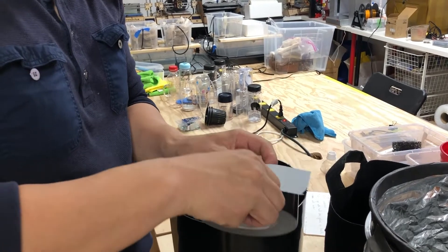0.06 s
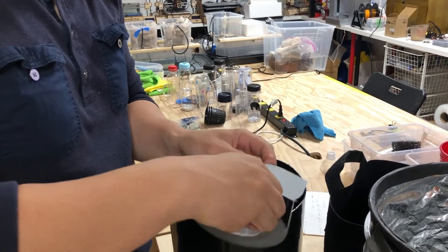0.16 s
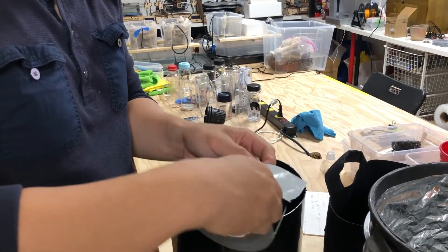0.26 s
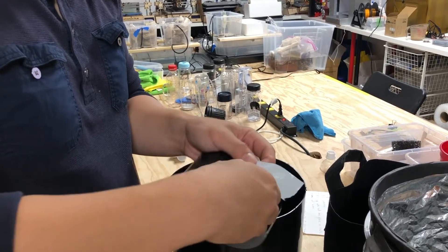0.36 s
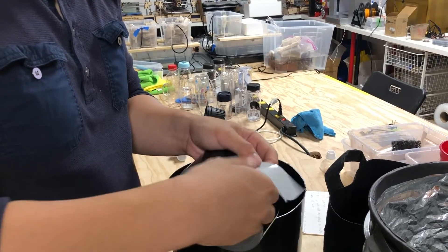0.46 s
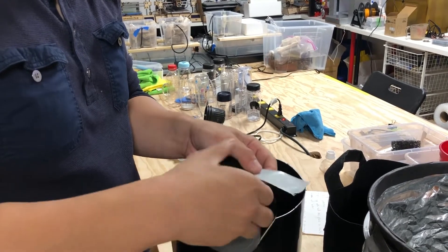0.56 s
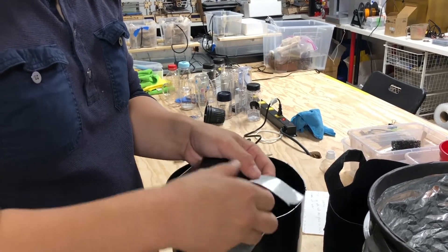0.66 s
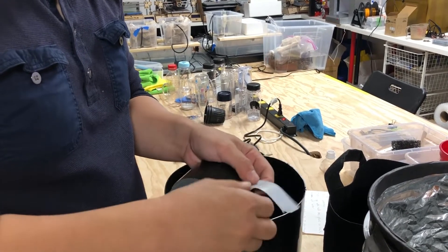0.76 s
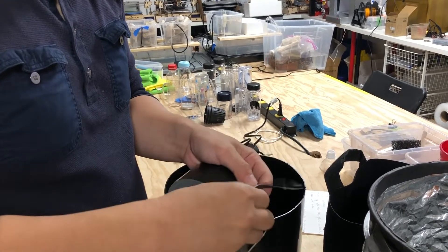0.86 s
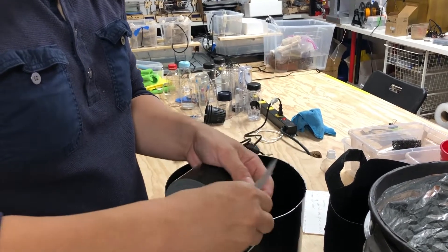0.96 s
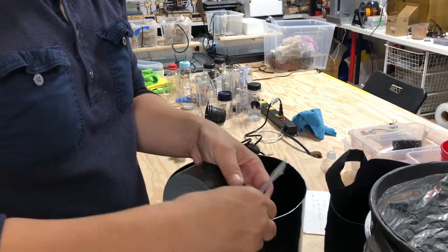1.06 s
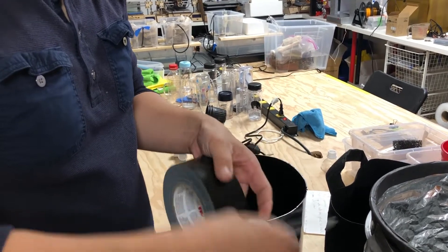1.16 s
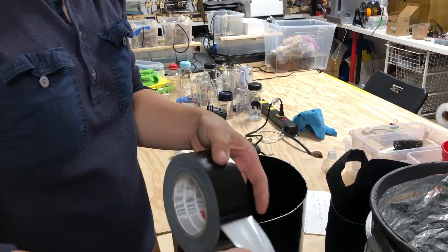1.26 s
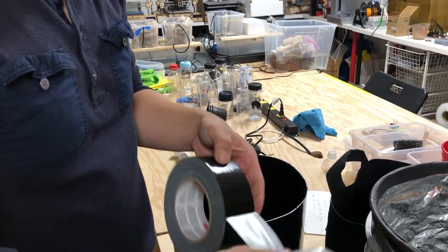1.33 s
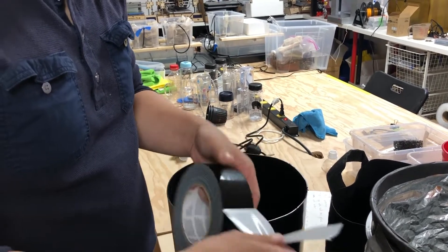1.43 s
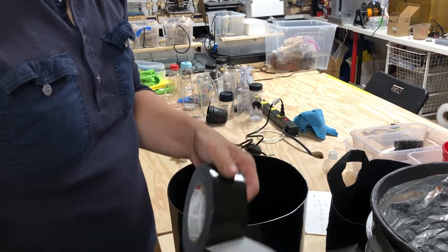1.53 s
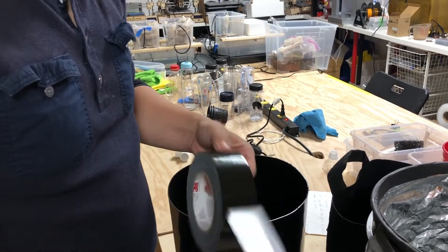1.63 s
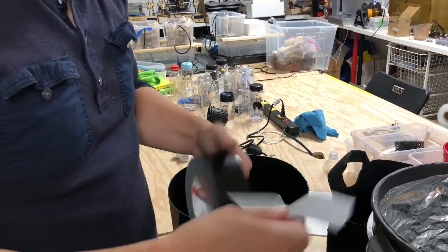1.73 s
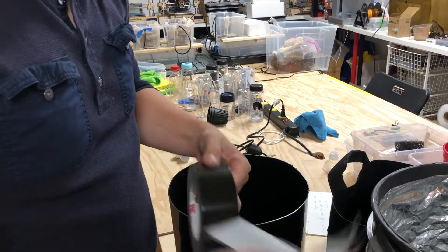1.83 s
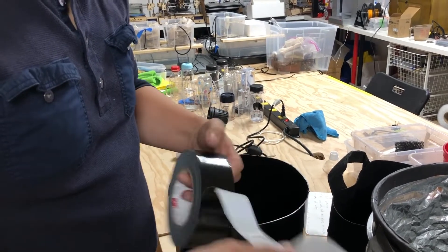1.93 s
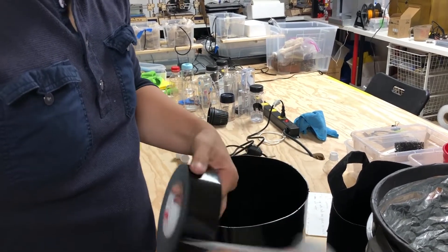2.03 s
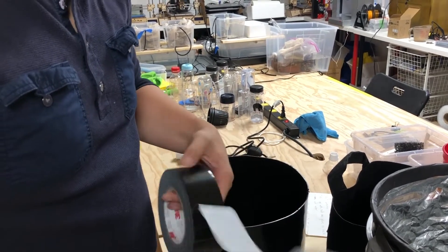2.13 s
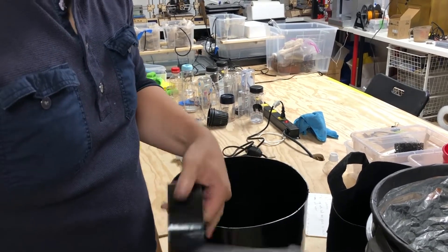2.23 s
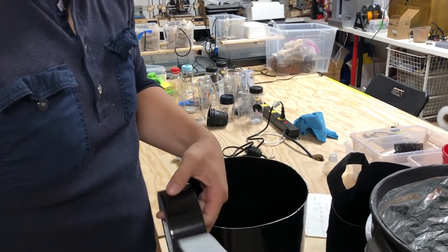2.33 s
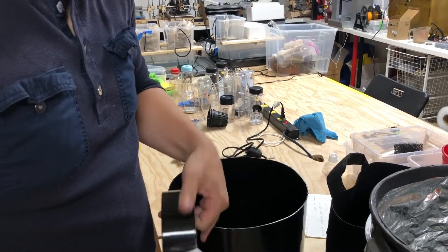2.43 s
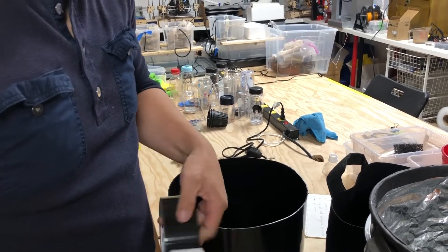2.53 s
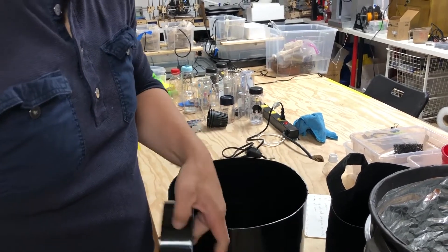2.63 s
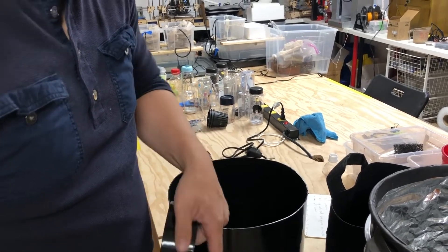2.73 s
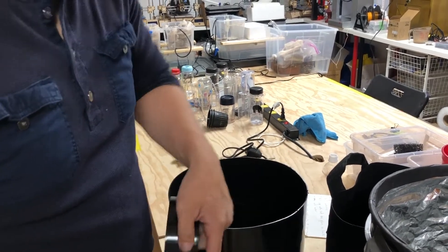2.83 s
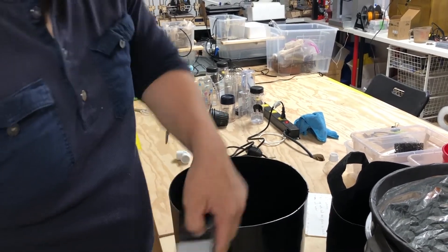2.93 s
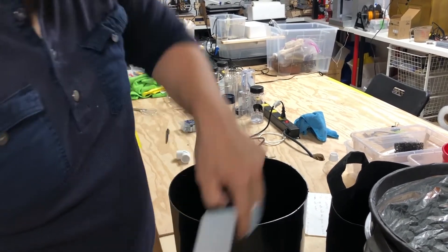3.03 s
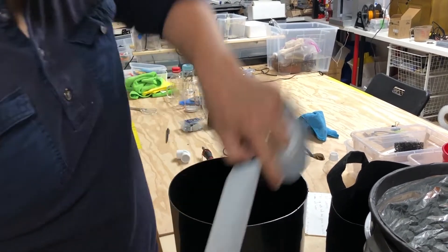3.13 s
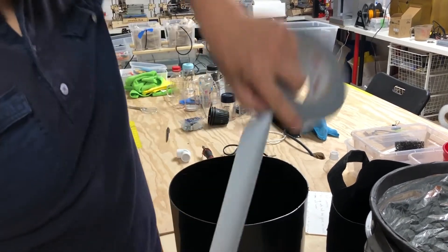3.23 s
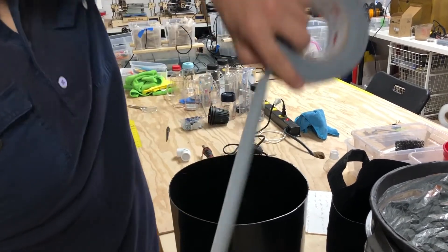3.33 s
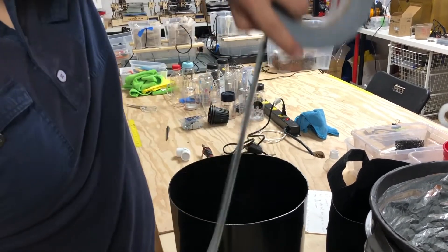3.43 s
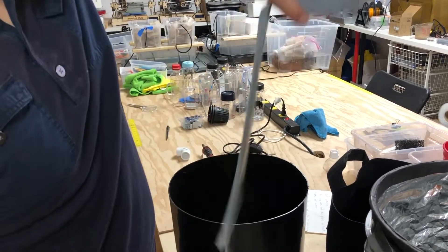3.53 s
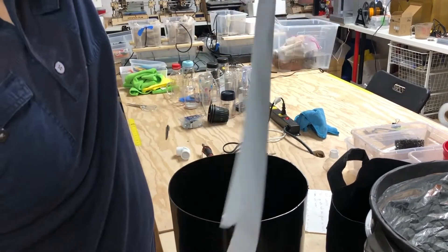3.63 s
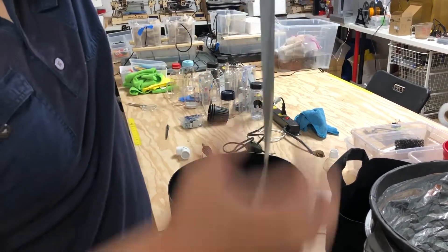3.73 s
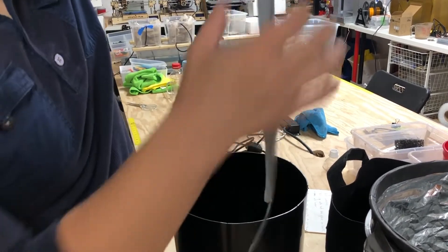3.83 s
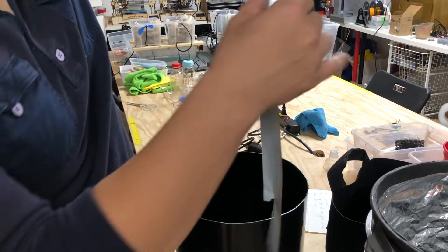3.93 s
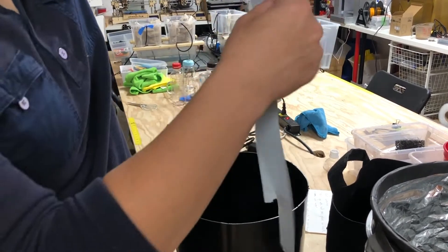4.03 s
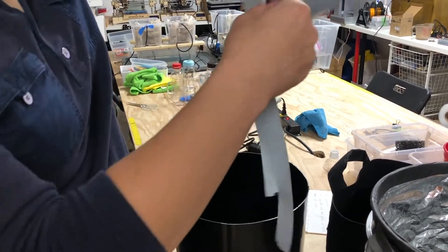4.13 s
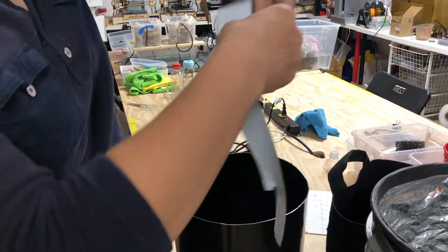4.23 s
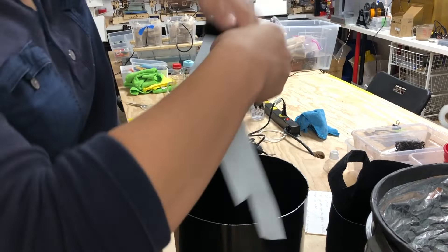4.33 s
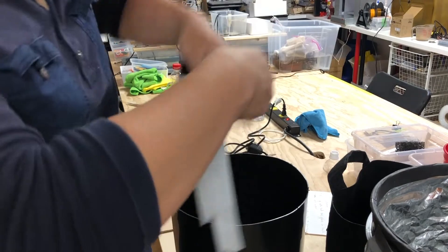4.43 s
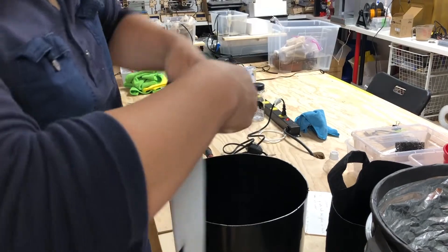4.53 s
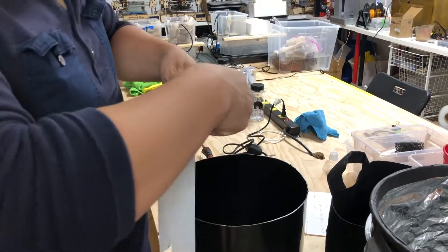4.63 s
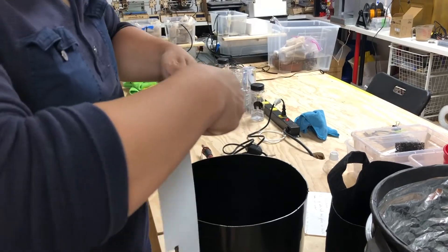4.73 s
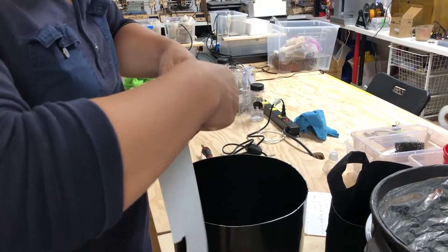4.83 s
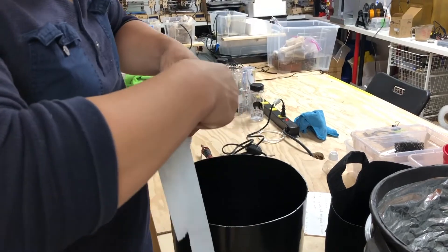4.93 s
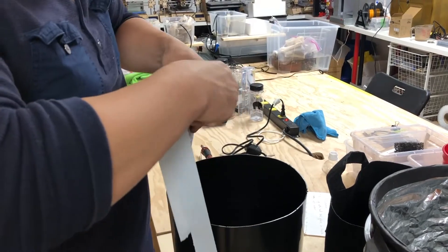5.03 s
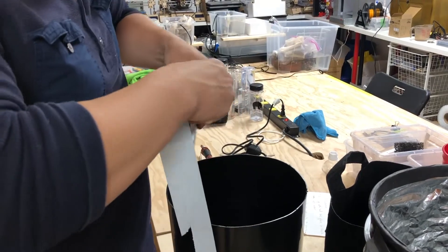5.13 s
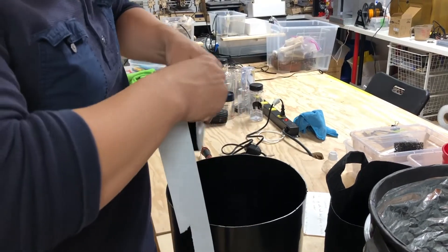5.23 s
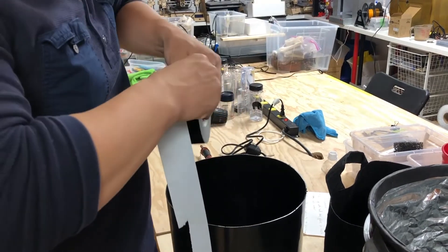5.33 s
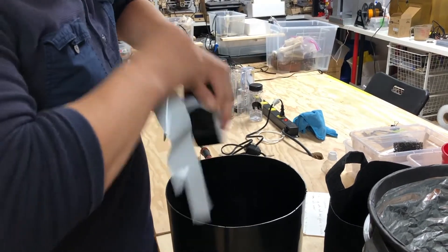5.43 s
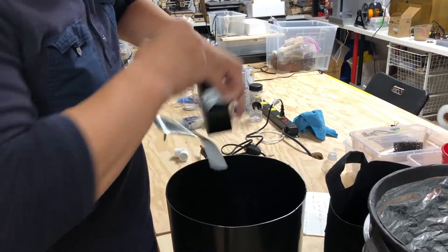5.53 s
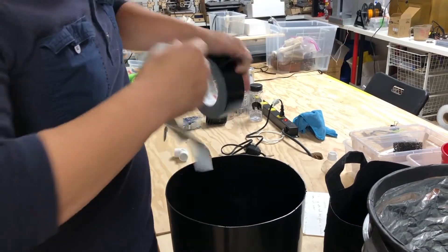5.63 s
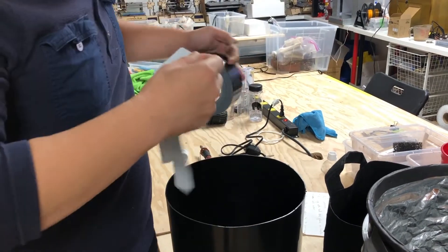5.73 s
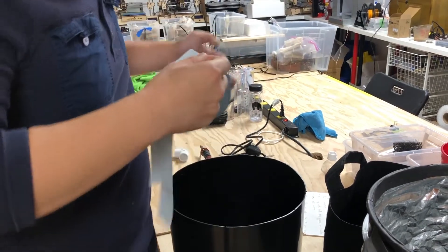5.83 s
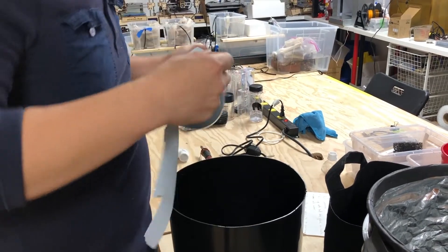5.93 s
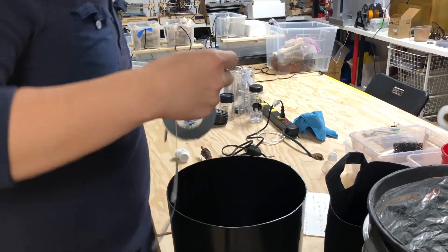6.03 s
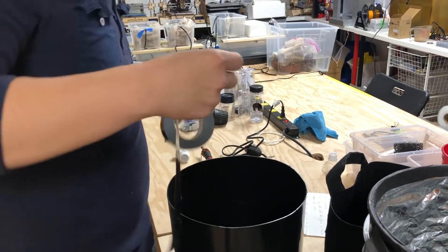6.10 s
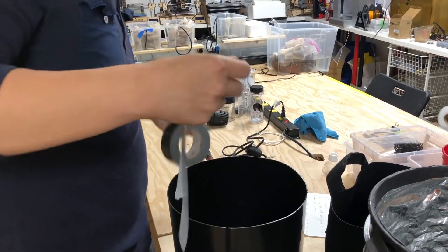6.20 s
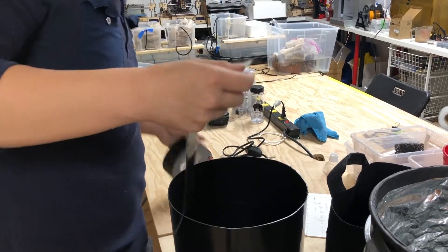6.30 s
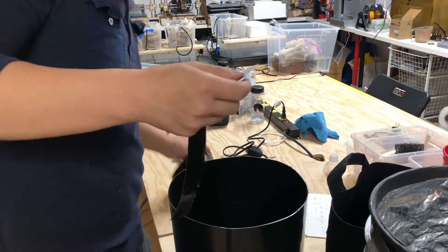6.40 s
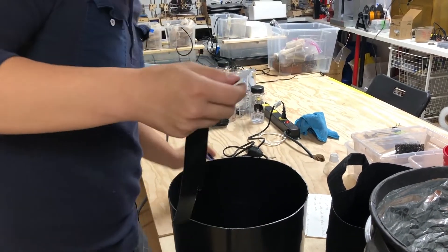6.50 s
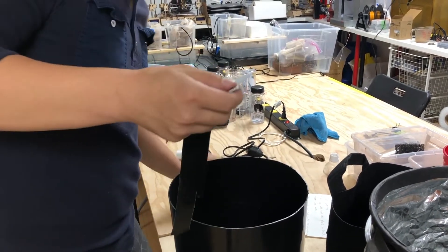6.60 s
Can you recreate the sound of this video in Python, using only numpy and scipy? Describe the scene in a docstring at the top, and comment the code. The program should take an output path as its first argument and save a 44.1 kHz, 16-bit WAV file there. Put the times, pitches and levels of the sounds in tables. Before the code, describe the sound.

Close, dry single-channel sound in a small cluttered workshop with a low air hum. Sticky cloth tape gives a few sharp snaps, pauses, then tears off its roll in a quick run of short, loud, crackling rips. Hands rustle the loose strip faintly, with one tick, before a single hard rip. A few small snaps follow, and something dull drops and bounces on the bench at the end.

```python
"""In a small cluttered workshop, cloth tape is peeled off its roll close by, over a low hum of air.
The glue lets go in single snaps, each an impulse of noise that rings a crease, and in rips of fast stick-slip
that drum the taut strip. A bucket's air sings on after three pulls, hands rustle the loose end as flickering
noise, and near the end something dull drops and bounces on the bench, exciting its decaying modes.
Near surfaces and a reverberant tail answer the tape."""
import sys
import numpy as np
from scipy import signal
from scipy.fft import rfft, irfft, next_fast_len
from scipy.io import wavfile
from scipy.ndimage import map_coordinates

SR = 44100
rng = np.random.default_rng(int(sys.argv[2]) if len(sys.argv) > 2 else 0)


def waveform_to_disk(signal):
    """Save audio, clipped to [-1, 1], as 16-bit WAV at the path in sys.argv[1]."""
    frames = np.transpose(np.atleast_2d(signal))
    scaled = np.clip(frames, -1, 1) * 32767
    samples = np.round(scaled).astype(np.int16)
    wavfile.write(sys.argv[1], SR, samples)


N = 293706  # length in samples


def amp(db):
    """Decibel law: 20 dB is a factor of ten in amplitude."""
    return 10 ** (np.asarray(db) / 20)


def unit(x):
    """Normalisation to an RMS of 1."""
    return x / np.sqrt(np.mean(x ** 2) + 1e-20)


def along(points, hz):
    """Interpolation of (Hz, value) points on a logarithmic frequency axis."""
    f, v = np.transpose(points)
    return np.interp(np.log(hz + 1), np.log(f + 1), v)


def coloured(x, spectrum):
    """Minimum-phase filtering: the folded cepstrum gives a causal kernel that keeps the level of white noise."""
    size = 4096
    cepstrum = irfft(np.log(amp(along(spectrum, np.fft.rfftfreq(size, 1 / SR)))))
    cepstrum[1:size // 2] *= 2
    cepstrum[size // 2 + 1:] = 0
    kernel = irfft(np.exp(rfft(cepstrum)))
    return signal.fftconvolve(x, kernel / np.linalg.norm(kernel))[:len(x)]


def fading(decays, count):
    """Frequency-dependent damping: noise of energy 1 in which each frequency dies at its own speed."""
    hz, t, bins = signal.stft(rng.standard_normal(count), SR, nperseg=256)
    damping = amp(-60 * t / along(decays, hz)[:, None])
    tail = signal.istft(bins * damping, SR, nperseg=256)[1][:count]
    return tail / np.linalg.norm(tail)


def wobble(rate):
    """Slow random modulation: a smooth curve through `rate` random knots a second."""
    knots = rng.standard_normal(int(N * rate / SR) + 4)
    return map_coordinates(knots, [np.arange(N) * rate / SR])


def resonate(force, start_hz, end_hz, t60):
    """Resonance: a steep-skirted mode glides while the force lasts, then rings out; noise keeps its level."""
    t = np.arange(3000) / SR
    decay = t * amp(-90 * t / t60)  # the factor t offsets part of the fall: about 60 dB below the peak at t60
    hz = np.linspace(start_hz, end_hz, len(force))
    hz = np.pad(hz, (0, len(decay) - 1), mode="edge")
    turn = np.exp(2j * np.pi * np.cumsum(hz) / SR)
    # shift the gliding mode down to 0 Hz, smooth, and shift it back
    slow = signal.fftconvolve(force / turn[:len(force)], decay / np.linalg.norm(decay))
    return np.sqrt(2) * np.real(slow * turn)


# Spectrum of the air and building rumble. Each row: frequency in Hz, relative level in dB per Hz.
HUM_SPECTRUM = [(20, -42.5), (50, -8), (110, -6), (240, -15), (400, -22.5), (700, -28.5), (1300, -36.5),
                (4000, -42), (10000, -47), (16000, -50.5)]
HUM_DB = -53


def hum():
    """Broadband flow noise: steady air and building rumble, slightly uneven in level."""
    return amp(HUM_DB + 1.3 * wobble(3)) * coloured(rng.standard_normal(N), HUM_SPECTRUM)


# Reflections from near surfaces. Each row: delay in seconds, level in dB.
NEAR_ECHOES = [(.0025, -20), (.0045, -19.5)]
# Reverberation of the room. Each row: frequency in Hz, time to fall 60 dB in seconds.
ROOM_DECAY = [(200, 0.61), (1000, 0.38), (4000, 0.28), (9000, .28), (15000, 0.31)]


def room(x):
    """Early reflection and reverberation: near surfaces, then a diffuse tail drawn anew every fifth of a second."""
    out = np.pad(x, (0, SR))
    for delay, db in NEAR_ECHOES:
        out[round(delay * SR):][:N] += amp(db) * x
    step = SR // 5
    for start in range(0, N, step):
        tail = amp(-16.5) * fading(ROOM_DECAY, count=SR // 2)
        # a denser, short-lived beginning
        tail[:2000] += amp(-13.5) * fading([(200, 0.27), (3000, 0.11), (15000, 0.085)], count=2000)
        wet = signal.fftconvolve(x[start:start + step], tail)
        out[start + 200:][:len(wet)] += wet
    return out[:N]


# The drop and its bounces. Each row: start in seconds, level in dB, rise time in seconds (to 98 percent),
# noise part in dB.
DROPS = [(6.4784, -29.5, 0.00094, 1), (6.495, -27, 0.0073, -7.5), (6.513, -33, .01, -3.5)]
# Spectrum of the impact noise. Each row: frequency in Hz, relative level in dB per Hz.
DROP_SPECTRUM = [(30, -36.5), (60, -11.5), (130, -5), (300, -7), (600, -14), (1300, -21.5), (2200, -26.5),
                 (5000, -38), (15000, -59)]
# Damping of the impact noise. Each row: frequency in Hz, time to fall 60 dB in seconds.
DROP_DECAY = [(80, 0.81), (250, 0.27), (800, 0.37), (1500, 0.2), (3000, 0.22), (10000, .1)]
# Modes of the bench. Each row: frequency in Hz, mean level in dB, time to fall 60 dB in seconds.
BENCH_MODES = [(62, -6, 0.21), (125.7, -8.5, 0.54), (155.7, 1, 0.36), (280.5, -1.5, 0.3),
               (438, -19.5, 0.248)]


def thud():
    """Modal excitation by impact: a soft drop gives dull noise dying by range and sets the bench modes booming."""
    out, t = np.zeros(N + SR), np.arange(SR // 2) / SR
    for s, db, rise, noise_db in DROPS:
        noise = coloured(fading(DROP_DECAY, count=SR // 2), DROP_SPECTRUM)
        noise = amp(noise_db) * noise / np.std(noise[:2000])
        boom = np.zeros(len(t))
        for hz, mode_db, t60 in BENCH_MODES:
            # each impact strikes the modes in slightly different proportion
            envelope = amp(mode_db + rng.normal(0, 2.2) - 60 * t / t60)
            boom += envelope * np.sin(2 * np.pi * hz * t)
        onset = 1 - np.exp(-t / rise * 4)
        out[round(s * SR):][:len(t)] += amp(db) * onset * (noise + boom)
    return out[:N]


# Hollow rings of the bucket. Each row: start in seconds, frequency in Hz, level in dB,
# time to fall 60 dB in seconds.
BUCKET_RINGS = [(1.268, 299, -35, .45), (1.656, 363, -39.5, .3), (2.085, 204, -39.5, .2)]


def bucket():
    """Cavity resonance: the air in the bucket below sings on briefly after the hardest pulls."""
    out, t = np.zeros(N + SR), np.arange(SR // 2) / SR
    for s, hz, db, t60 in BUCKET_RINGS:
        onset = 1 - np.exp(-t / 0.0028)
        out[round(s * SR):][:len(t)] += amp(db - 60 * t / t60) * np.sin(2 * np.pi * hz * t) * onset
    return out[:N]


# Hands on the tape, joined by straight lines. Each row: time in seconds, level in dB, brightness in dB.
HANDLING = [(0, -70, 1.5), (.47, -70.5, 2.5), (.52, -62.5, 4), (.57, -80, 5), (.73, -86, 6),
            (.79, -63.5, -6), (.85, -81.5, 4), (.93, -77.5, 8.5), (2.8, -70.5, -3.5), (2.86, -56.5, -2),
            (2.93, -61, 2), (2.97, -70, -5), (3.15, -71.5, -4.5), (3.22, -53.5, -0.5), (3.3, -66.5, -2.5),
            (3.52, -53, -6), (3.68, -71.5, -4), (3.95, -71.5, -5.5), (4.1, -73, 0), (4.16, -68, 3),
            (4.22, -70.5, 0), (4.3, -65.5, -4), (4.36, -74, -3), (4.46, -70, -4), (4.49, -60.5, -6.5),
            (4.52, -76, -2.5), (4.6, -66, -9), (4.7, -58.5, -7), (4.73, -57, -8.5), (4.82, -68, -8.5),
            (5.3, -80, -4), (5.9, -62.5, -5), (5.94, -58, -11), (6.0, -74, -6), (6.45, -76, -6),
            (6.66, -67, -8)]
RUSTLE_DULL_DB = -8.5


def rustle():
    """Friction noise: faint rubbing and creasing by the hands, with tiny random ticks."""
    s, *columns = np.transpose(HANDLING)
    level_db, bright_db = (np.interp(np.arange(N) / SR, s, column) for column in columns)
    hits = (rng.random(N) < 30 / SR) * rng.exponential(1.6, N)  # about 30 a second
    ticks = signal.lfilter([1], [1, -.97], hits)
    grain = (1 + ticks) * amp(2.7 * wobble(40) + 1.5 * wobble(12))
    parts_db = np.array([RUSTLE_DULL_DB - 0.32 * bright_db, 0 * bright_db, bright_db])
    return amp(level_db + parts_db) * unit(grain) * rng.standard_normal((3, N))


# Rips; the resonances glide as the free length changes. Each row: start and end in seconds,
# level in dB at start, middle and end, nominal slips per second, dull part in dB,
# crease frequency in Hz at start and end, strip frequency in Hz at start and end, strip level in dB.
STICK_SLIP_RIPS = [(1.003, 1.051, -45, -44.5, -48, 201.5, -22, 5540, 5550, 400, 400, -34),
                   (1.1561, 1.22, -20.5, -16.5, -13, 451, -9.5, 4330, 4860, 750, 420, -17),
                   (1.228, 1.265, -25, -16.5, -17.5, 397, -9, 6325, 5330, 427, 280, -9),
                   (1.529, 1.585, -24.5, -14.5, -16, 360, -10.5, 4828, 3700, 200, 229.4, -16),
                   (1.584, 1.65, -14.5, -15.5, -21, 378.7, -12.5, 3521, 7170, 230, 420.5, -14.5),
                   (1.806, 1.833, -19.5, -12.5, -19, 413, -13.5, 5486, 4720, 330, 379.2, -18),
                   (1.895, 1.922, -20, -28, -21.5, 299.6, -13.5, 3670, 3950, 357, 300, -17),
                   (2.033, 2.068, -24.5, -21.5, -14.5, 396.4, -12.5, 3210, 5650, 345, 755, -14),
                   (2.071, 2.089, -16, -16, -21, 289, -7.5, 5890, 8060, 240, 221, -16),
                   (2.107, 2.139, -27, -38, -24, 199, -13, 5700, 5900, 597, 500, -10.5),
                   (2.258, 2.302, -21.5, -14, -12.5, 403.6, -13, 4794, 2650, 450, 380, -19.5),
                   (2.317, 2.346, -21, -23.5, -24, 248.2, -11.5, 6340, 5700, 750, 300, -13),
                   (2.45, 2.489, -20.5, -18.5, -13, 408, -10.5, 3253, 5680, 800, 700, -15),
                   (2.506, 2.527, -26.5, -27.5, -29.5, 200.9, -4.5, 3320, 5000, 440, 329.8, -11),
                   (5.429, 5.487, -32, -16.5, -8.5, 450, -14, 5883, 5170, 1000, 900, -22)]
SMOOTH_SLIPS_PER_S = 750  # the nearer a rip comes to this rate, the more its slips merge into even tearing
RIP_BRIGHT_DB, CREASE_DB, UPPER_MODE_DB, STRIP_T60_S = -4.5, -9, -5.5, .013
STRIP_GROWS_DB = 3  # the strip drums louder towards the end of each rip


def rips():
    """Stick-slip friction: uneven slips over a dense tearing drive the crease at the roll and the taut strip."""
    force, ring = np.zeros((3, N)), np.zeros(N)
    for (s, end, db0, db1, db2, rate, dull_db, crease_hz0, crease_hz1,
         strip_hz0, strip_hz1, strip_db) in STICK_SLIP_RIPS:
        start, t = round(s * SR), np.arange(round((end - s) * SR)) / SR
        gap, size = rng.standard_normal((80, 2)).T
        times = np.cumsum(np.exp(.3 * gap)) / rate
        age = t - times[:, None]
        slip_fall = amp(-10 * np.abs(age) / 0.0012)  # 10 dB in 1.2 ms
        slips = np.sum(amp(4 * size)[:, None] * (age >= 0) * slip_fall, axis=0)
        share = np.clip(1 - rate / SMOOTH_SLIPS_PER_S, 0, 1)  # part of the tearing that is separate slips
        pull = amp(np.interp(t, [0, t[-1] / 2, t[-1]], [db0, db1, db2]))
        shape = pull * unit(1 - share + share * unit(slips))
        noise = shape * rng.standard_normal((6, len(t)))
        # every slip begins with one jerk of either sign, common to all ranges and resonances
        inside = times < t[-1]
        jerk_sizes = (np.sign(gap) * amp(3 * size))[inside]
        jerks = np.bincount((times[inside] * SR).astype(int), jerk_sizes, len(t))
        noise += 4.1 * share * pull * jerks
        force[:, start:start + len(t)] += amp([[dull_db], [0], [RIP_BRIGHT_DB]]) * noise[:3]
        crease = amp(CREASE_DB) * resonate(noise[3], crease_hz0, crease_hz1, t60=0.0069)
        strip = resonate(amp(STRIP_GROWS_DB * t / t[-1]) * noise[4], strip_hz0, strip_hz1, STRIP_T60_S)
        upper = amp(UPPER_MODE_DB) * resonate(noise[5], 2.4 * strip_hz0, 2.4 * strip_hz1, t60=0.0068)
        ring[start:start + len(strip)] += crease + amp(strip_db) * (strip + upper)
    return force, signal.sosfilt(signal.butter(2, 150, "high", fs=SR, output="sos"), ring)


# Single releases of the glue. Each row: start in seconds, level in dB, dull part in dB,
# time to fall 10 dB in milliseconds (at least 0.2 is used), crease ring in Hz.
GLUE_SNAPS = [(0.0066, -42, -8.5, 3, 11020), (0.0649, -34, -15.5, 2, 3445), (0.0818, -41, -14, 8.5, 5176),
              (0.0965, -42, -25, 2, 5250), (0.1011, -41, -16.5, 2, 5200), (0.126, -49, -17.5, 6.5, 9020),
              (0.1955, -35, -13, 6, 3473), (0.209, -25.5, -23, 3, 4200), (0.2266, -20.5, -20.5, 3, 4858),
              (0.2401, -37.5, -20.5, 7, 5820), (0.2999, -19.5, -28.5, 3.5, 7505),
              (0.3392, -7, -23, 3, 4248), (0.3506, -14, -31, 2, 4395), (0.489, -44.5, -11.5, 6, 7645),
              (0.5013, -36.5, -10.5, 9, 5900), (0.5155, -39, -7.5, 1, 4733),
              (0.9113, -38.5, -18, 4.5, 3850), (0.9501, -51, -22, 5, 7150), (0.9817, -48, -23, 3, 6060),
              (1.0047, -30, -24, 2.5, 6600), (1.0156, -33, -19.5, 6, 9790), (1.0386, -39.5, -30, 0.4, 9540),
              (1.0458, -37, 3, 1.5, 1480), (1.0508, -40, -8, 3.5, 9490), (1.0543, -12.5, -18, 5.5, 4740),
              (1.065, -18.5, -15, 3.5, 3650), (1.0707, -14.5, -18, 3, 6100),
              (1.0778, -12.5, -18.5, 3, 6840), (1.0826, -17, -14, 3.5, 4830),
              (1.0864, -20.5, -9.5, 1.1, 5360), (1.092, -11.5, -20, 7.5, 4720),
              (1.098, -15.5, -17.5, 0, 4950), (1.109, -15, -16, 7.5, 3278), (1.1147, -14.5, -21, 4, 4686),
              (1.1576, -9, -15, 1.5, 6150), (1.1634, -11, -14, 3.5, 3794), (1.1697, -15, -7.5, -0.2, 1440),
              (1.1804, -13.5, -6.5, 0.2, 4425), (1.1909, -11, -15, 1.75, 4380),
              (1.1943, -8, -18.5, 0.8, 4394), (1.2282, -8.5, -14.5, 2.5, 3400),
              (1.2361, -8.5, -9.5, 4, 3340), (1.2504, -10.5, -14, 0.3, 6574), (1.2612, -11, -18, 2.6, 5130),
              (1.268, -13.5, -10, 1.8, 5292), (1.5155, -25.5, -4.5, 4, 5000),
              (1.5245, -24.5, -12, 3.5, 3700), (1.5288, -22, -9.5, 3, 5075), (1.5421, -15, -19, 5, 4894),
              (1.5591, -11.5, -14.5, 4.5, 4182), (1.5738, -6.5, -12.5, 0.4, 4633),
              (1.582, -13, -10, .5, 4245), (1.59, -11, -13, 2, 3780), (1.5998, -8, -16.5, 1, 4740),
              (1.6066, -11, -16, 1.4, 3648), (1.6106, -10, -17.5, -0.1, 3757),
              (1.6153, -11, -17.5, 0.9, 5917), (1.6232, -12, -18, 2, 3513), (1.635, -9.5, -20, 2, 5240),
              (1.6556, -10, -16.5, 2.5, 5520), (1.8039, -16, -19, 4.5, 4900), (1.8866, -13, -13, 3.5, 5633),
              (1.901, -16, -13, 3, 3815), (1.9059, -18.5, -16.5, 4, 4367), (1.913, -20, -12, 5, 4460),
              (1.9263, -28, -17.5, 4.5, 3880), (2.0279, -23, -19.5, 5.5, 3214),
              (2.0553, -12, -20.5, 5, 4540), (2.0691, -9, -18, 3, 5897), (2.0774, -7, -12.5, 2, 6116),
              (2.1053, -17.5, -20, 1.47, 5720), (2.1105, -14, -14, 3.5, 5570),
              (2.1337, -14, -12.5, 4, 5905), (2.2634, -17.5, -22, 2, 3406), (2.3012, -11.5, -18, 0.7, 3163),
              (2.3185, -15, -14, 1.8, 6434), (2.3246, -13.5, -21, 1.5, 6075),
              (2.3309, -18.5, -19.5, 0.58, 6140), (2.3466, -18, -13, 0.7, 8490),
              (2.4325, -15.5, -19.5, 3, 2896), (2.45, -13, -9.5, 5.5, 3055),
              (2.4699, -13.5, -6.5, 3.5, 4818), (2.4784, -10, -16.5, 3, 4470),
              (2.4877, -8, -21.5, 0.1, 4847), (2.5115, -17, -13.5, 3.5, 6120),
              (2.5221, -23.5, -17, 2, 7800), (3.16, -38.5, -11, 4, 3314), (3.1931, -39.5, 7, 1.5, 3287),
              (3.1962, -13.5, -15.5, 2.5, 3470), (3.195, -17, -14, 1, 1806), (3.3152, -51, -4, 5, 1550),
              (3.3861, -53.5, -1, 7, 7560), (3.4057, -50, -5, 11, 8710), (3.4154, -43.5, -8, 6, 5070),
              (3.4547, -38.5, -9, 7, 7004), (3.4872, -29, -7.5, 4.5, 3820), (3.5248, -36.5, 2, 4.5, 6000),
              (3.5597, -45, -12, 1.5, 4004), (3.5975, -56, -10, 3.5, 4230), (3.6394, -45, -2.5, 2, 4140),
              (4.0107, -58.5, -3, 8.5, 3460), (4.0657, -62, -0.5, 7.5, 6000), (4.169, -66, 14, 7.5, 1598),
              (4.26, -33, -4, 2.5, 4000), (4.6413, -36.5, -6, 7.5, 3126), (4.6774, -37.5, -11, 4.5, 4990),
              (4.7194, -46.5, -3, 10.5, 4140), (4.7333, -31.5, -0.5, 4.5, 2970), (4.855, -54.5, 9, 2, 1287),
              (5.406, -45.5, -3.5, 4.5, 6040), (5.4235, -50.5, -5, 6.5, 10680), (5.4284, -40, -10, 3, 4230),
              (5.4485, -17.5, -16.5, 2.5, 4720), (5.4514, -15, -4.5, 2, 5900), (5.4623, -13, -15, 4, 5360),
              (5.4843, -5.5, -15.5, 1.45, 6000), (5.6695, -22, -20, 3, 4167),
              (5.6741, -27, -29, 1.74, 4146), (5.679, -20.5, -22, 6, 4270), (5.6949, -26, -11, 6.5, 6485),
              (5.9228, -37, -1, 3.5, 2625), (6.6231, -56.5, 6, 4.5, 1370)]
SNAP_BRIGHT_DB, BRIGHT_DB_PER_OCTAVE = -4, 7.5  # bright part for a 5 kHz crease; a higher crease is brighter
CREASE_LOWEST_HZ = 1130  # the small crease radiates little below this


def snaps():
    """Impulsive release: a crack, then threads of glue parting, forces three ranges of motion; the crease rings."""
    force, ring, t = np.zeros((3, N + SR)), np.zeros(N + SR), np.arange(1500) / SR
    for s, db, dull_db, fall_ms, crease_hz in GLUE_SNAPS:
        start = round(s * SR)
        bright_db = SNAP_BRIGHT_DB + BRIGHT_DB_PER_OCTAVE * np.log2(crease_hz / 5000)
        parting = amp(-10 * (t / (max(fall_ms, .2) / 1000)) ** 1.3)
        burst = 0.84 * parting * rng.standard_normal((4, len(t)))
        burst[:, 3] += 3.8 * rng.choice([-1, 1])  # the crack is one sudden jerk, felt by every range at once
        parts_db = np.array([[dull_db], [0], [bright_db]])
        force[:, start:][:, :len(t)] += amp(db + parts_db) * burst[:3]
        crease = resonate(burst[3], crease_hz, crease_hz, t60=.0018)
        ring[start:][:len(crease)] += amp(db + max(0, bright_db, dull_db) - 1) * crease
    highpass = signal.butter(3, CREASE_LOWEST_HZ, "high", fs=SR, output="sos")
    return force[:, :N], signal.sosfilt(highpass, ring[:N])


# Three broad ranges of tape motion: dull, middle and bright. Each row: frequency in Hz, relative level in dB.
DULL_RANGE = [(200, -44.5), (500, -27), (1000, -8), (1400, -8), (1800, -6.5), (2400, -8), (4000, -27),
              (8000, -60.5)]
MIDDLE_RANGE = [(800, -45), (2000, -21), (3000, -2), (4500, -1), (6200, -2), (8500, -6.5), (16000, -39)]
BRIGHT_RANGE = [(3000, -51), (5500, -20), (7500, -2), (10500, 0.5), (13000, -4.5), (16000, -8.5),
                (20000, -12.5)]


def tape():
    """Source-filter principle: all forces on the tape sound through its three broad ranges of motion."""
    (snapped, crease), (torn, ring) = snaps(), rips()
    force = snapped + torn + rustle()
    ranges = (DULL_RANGE, MIDDLE_RANGE, BRIGHT_RANGE)
    return crease + ring + sum(coloured(f, colour) for f, colour in zip(force, ranges))


def scene():
    """Superposition: the tape in its room, with the bucket, the drop and the hum added, as one channel."""
    return (room(amp(-2.0) * tape()) + bucket() + thud() + hum())[None]


TOP_HZ = 15900


def record(dry):
    """Saturation and band limiting: rounds off the highest peaks, cuts the deepest bass and all above TOP_HZ."""
    x = dry / (1 + np.abs(dry / 0.98) ** 8) ** (1 / 8)
    x = signal.sosfilt(signal.butter(3, 45, "high", fs=SR, output="sos"), x)
    size = next_fast_len(N + 4096)
    passband = np.fft.rfftfreq(size, 1 / SR) < TOP_HZ
    return irfft(rfft(x, size) * passband, size)[:, :N]


dry = scene()
out = record(dry)
waveform_to_disk(out)
```